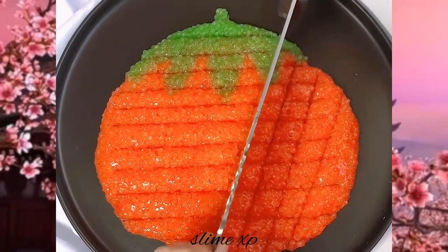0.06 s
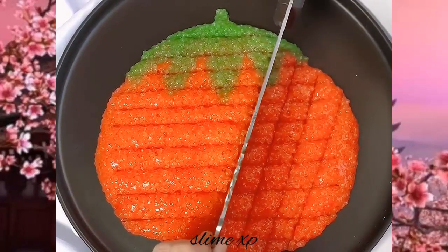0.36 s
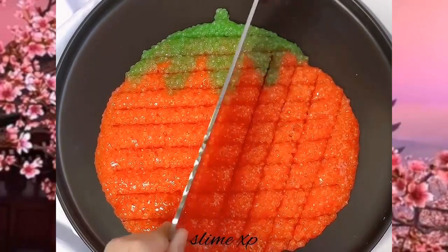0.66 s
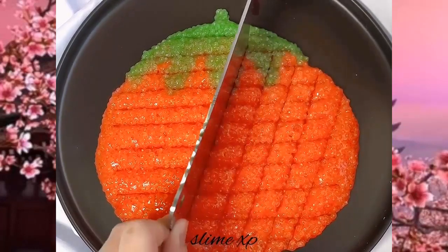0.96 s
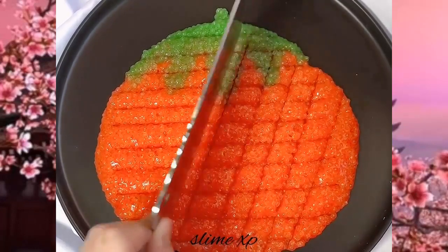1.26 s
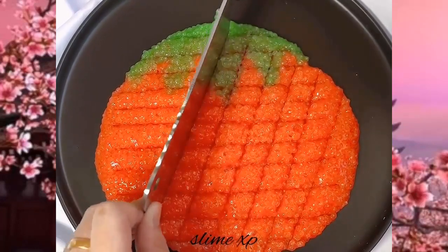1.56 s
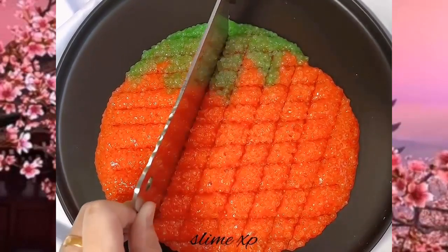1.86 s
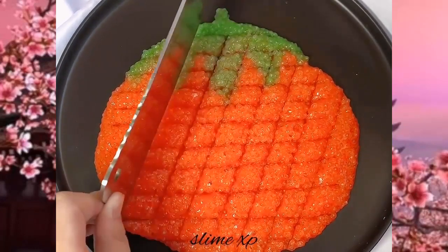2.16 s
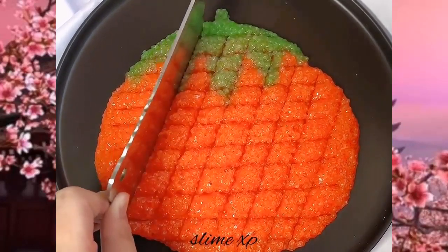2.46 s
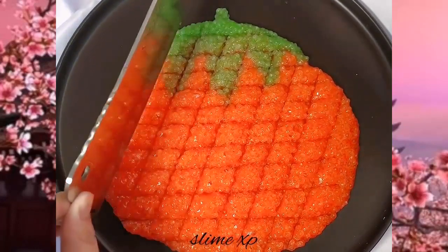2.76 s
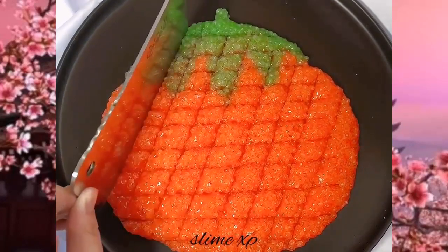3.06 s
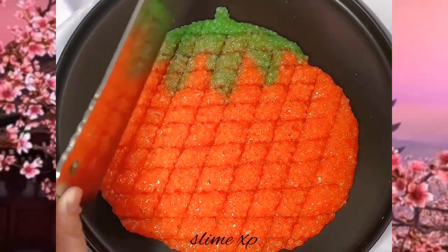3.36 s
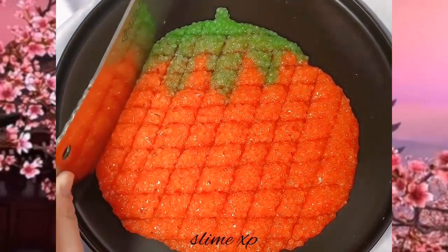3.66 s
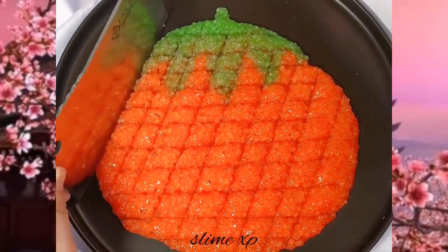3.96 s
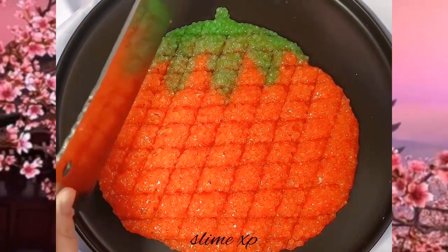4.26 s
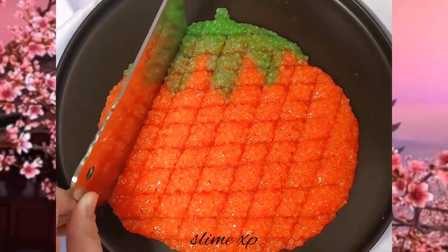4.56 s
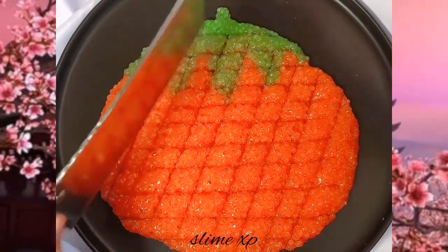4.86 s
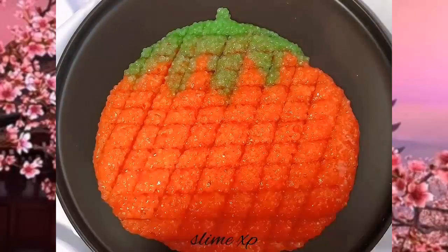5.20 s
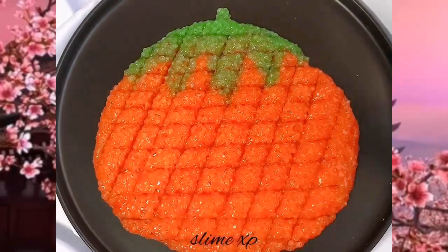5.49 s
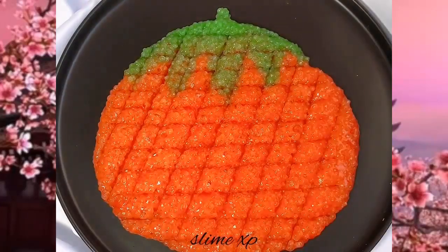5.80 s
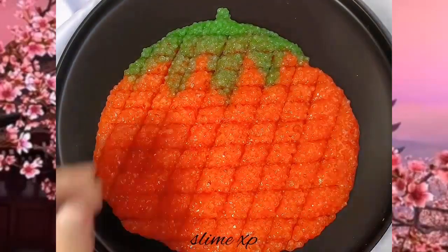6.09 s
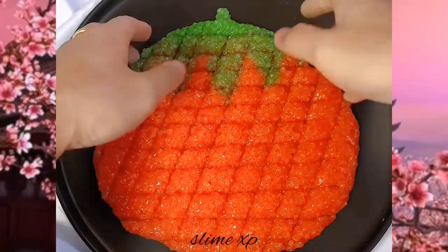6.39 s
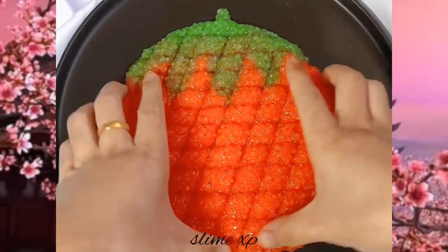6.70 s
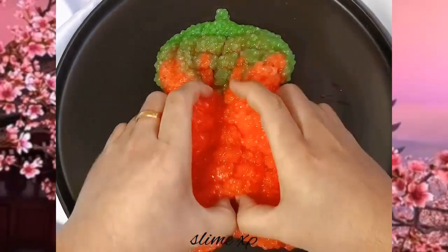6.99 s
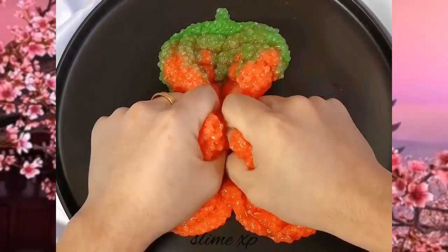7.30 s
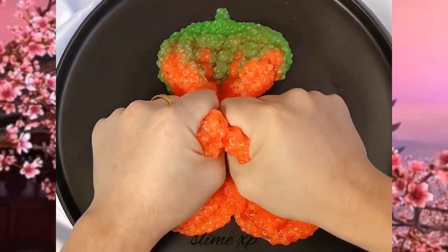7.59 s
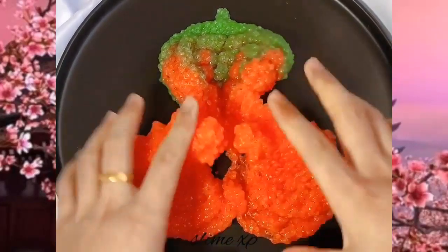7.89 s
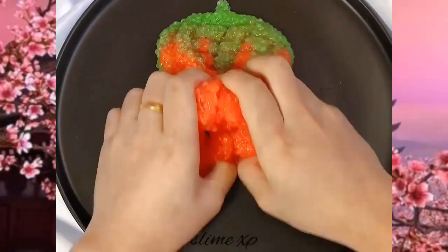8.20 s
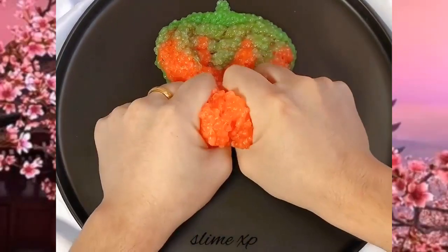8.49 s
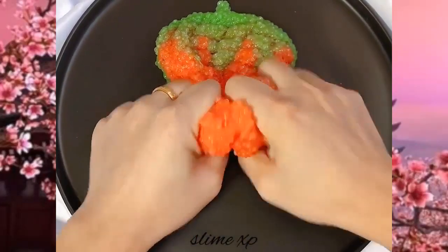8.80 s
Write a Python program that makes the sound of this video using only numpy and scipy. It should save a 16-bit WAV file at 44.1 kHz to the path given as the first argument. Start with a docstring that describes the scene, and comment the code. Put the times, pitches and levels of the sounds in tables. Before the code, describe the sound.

A kitchen knife presses seven times into bead-filled slime in a pan. Each stroke gives a short crunch with tiny snaps, muffled bead knocks and a dull thump, then a brief rasp as the blade peels out. The knife slides aside with a faint hiss. Two hands then squeeze the slime twice, with dense fizzing, wet plops, spurts of air and one small squeak. It is all heard close up in a small quiet room.

```python
"""First a kitchen knife presses seven times through bead-filled slime in a pan. Tiny air pockets crackle,
bigger ones snap, and beads slip from under the blade and knock on the pan. Each stroke ends in a dull
thump on the table, and the blade peels out again. After about five seconds the knife slides aside.
From about six and a half seconds two hands squeeze the slime twice: it fizzes, plops, squirts air and
squeaks once. All of it is heard close up in a small quiet room."""
import sys
import numpy as np
from scipy import signal
from scipy.fft import rfft, irfft
from scipy.io import wavfile
from scipy.ndimage import uniform_filter1d

SR = 44100
rng = np.random.default_rng(int(sys.argv[2]) if len(sys.argv) > 2 else 0)


def inscribe(sig):
    """Save sig as 16-bit PCM at rate SR to the path in sys.argv[1].

    A 1-D sig is mono; a 2-D sig holds one channel per row.
    Samples are clipped to [-1, 1] before scaling.
    """
    pcm = np.round(np.clip(np.atleast_2d(sig).T, -1, 1) * 32767)
    wavfile.write(sys.argv[1], SR, pcm.astype(np.int16))


N = 390285
TIME = np.arange(N) / SR
TOP_HZ = 16000

# A "fade time" (t60) is how long a sound takes to drop by 60 dB. A "relative" level is scaled later.
# Knife strokes. Each row: landing time and pressing time in seconds; relative levels of crunch, bead
# grinding and thump in dB; contact time in milliseconds; resting time in seconds; level change while
# resting in dB; relative level in dB of a treble band that is switched in on some strokes.
CUTS = [(0.406, 0.12, -39, -30.5, -20.5, 2.9, 0.064, -22, -43.5),
        (1.104, 0.16, -39, -36.5, -27, 6.2, 0.071, -10, -102),
        (1.849, 0.253, -41, -37, -29, 0.32, 0.055, -12, -73),
        (2.53, 0.19, -42, -39, -19, 1.5, 0.085, -8.5, -43),
        (3.156, 0.13, -42.5, -39, -21, 0.99, 0.092, -5, -68),
        (3.873, 0.099, -40, -39, -29, 1.2, 0.11, -17.5, -109),
        (4.568, 0.12, -42, -42, -25, 2.3, 0.12, -17.5, -44.5)]
# The blade peels out. Each row: start and length in seconds, fizz and added treble band in dB.
PEELS = [(0.588, 0.049, -41, -49.5), (1.322, 0.052, -41, -43.5), (2.07, 0.08, -43.5, -97),
         (2.74, .034, -42, -50), (3.407, 0.047, -40.5, -42), (4.169, .03, -48, -48),
         (4.849, 0.055, -43, -41)]
# Blade or fingertip touches the slime. Each row: start in seconds, relative dB, fade time in seconds.
TOUCHES = [(0.11, -46, 0.14), (.841, -45, 0.26), (1.501, -48.5, 0.28), (2.306, -54.5, 0.17),
           (2.945, -49, 0.13), (3.684, -50, 0.17), (6.41, -52.5, 0.16), (6.734, -52.5, 0.071)]
# The blade shifts in the cut; the last row is one sharp click as the knife is put aside. # Each row: start in
# seconds, relative dB, fade time in seconds.
SLIPS = [(0.172, -45, 0.21), (0.211, -39, 0.16), (3.967, -49.5, 0.021), (4.034, -43.5, 0.038),
         (4.664, -44, 0.04), (4.703, -45.5, 0.22), (5.9715, -42, 0.014)]
# A filter that shapes the knife's fizz and cuts it off near 10 kHz.
# Each row: frequency in Hz, relative level in dB.
CUT_FILTER = [(200, 12.5), (600, 6.5), (2500, 4), (6000, 7), (9500, 8.5), (10600, -40), (16000, -55)]
# Notes of the steel blade. Each row: pitch in Hz, width in Hz, relative level in dB.
BLADE_NOTES = [(5950, 260, 0), (7600, 160, -9), (10950, 60, -3)]
# Fingers squeeze. Each row: moment when half closed, then closing, holding and easing times, all in
# seconds; relative levels of fizz and of larger bubbles in dB.
GRIPS = [(6.537, 0.17, 0.0045, 0.092, -56.5, -53.5), (6.848, 0.13, 0.019, 0.2, -41, -42.5),
         (7.138, 0.1, 0.23, 0.25, -41, -41), (7.746, 0.05, 0.011, 0.063, -43, -44.5),
         (7.811, 0.031, 0.025, 0.066, -41.5, -38.5), (8.179, 0.18, 0.33, 0.19, -43.5, -42),
         (8.835, 0.099, 0.017, 0.036, -50, -42.5)]
# Tone of the fizz under the hands. Each row: frequency in Hz, relative level in dB.
KNEAD_TONE = [(150, -5), (600, -20.5), (2500, -4), (5000, -1.5), (8000, -1), (16000, -3)]
# Bubbles shrink and sound higher as the grip tightens. Each row: time in seconds, pitch in Hz.
BUBBLE_PITCH = [(7.02, 920), (7.3, 1600), (7.65, 1580), (7.85, 1253), (8.5, 1650), (8.85, 1638)]
# The largest air pockets snap. Each row: start in seconds, peak level in dB, pitch in Hz.
SNAPS = [(0.1547, -16.5, 7800), (0.997, -19.5, 7100), (1.011, -30, 7900), (2.4515, -19, 10100),
         (2.4713, -17.5, 8000), (.18, -25, 6000), (4.162, -23, 7400), (6.8588, -9.5, 4540),
         (7.0453, -11, 8640), (7.1152, -12, 7900), (7.373, -10, 10500), (7.4589, -11, 10500),
         (7.6294, -7, 8540), (8.21, -14, 11500), (8.2661, -13.5, 10100), (8.5143, -18, 10100),
         (8.6193, -13, 6450)]
# The blade slips off a bead or lands on the pan. Each row: start in seconds, peak level in dB,
# frequency in Hz above which the slime muffles the blow.
KNOCKS = [(.343, -22, 1200), (0.35, -21.5, 1180), (.371, -22.5, 1190), (0.403, -27, 1480),
          (1.07, -26, 1290), (1.101, -21, 1760), (1.2892, -27, 4150), (1.633, -29, 2210),
          (1.849, -24, 1990), (2.515, -24, 1590), (2.528, -23.5, 2000), (3.108, -29, 1120),
          (3.3126, -14, 1900), (3.874, -28.5, 1900), (4.54, -23, 2600), (4.767, -29.5, 1700)]
# Notes of the pan, damped by slime. Each row: pitch in Hz, relative level in dB, fade time in seconds.
PAN_NOTES = [(589, -9.5, 0.012), (760, 1, 0.0046), (915, 4, 0.0066), (1133, -2, 0.0066), (1497, -8, 0.015),
             (2330, -17.5, 0.02)]
# Short low bumps. Each row: start in seconds, level in dB, length of the push in milliseconds.
BUMPS = [(3.122, -28, 3.2), (3.315, -17, .65), (4.707, -31, 0.35), (5.971, -22, 3), (7.005, -36.5, 3.8),
         (7.836, -27.5, 24), (8.076, -32.5, 19), (8.619, -35, 0.3)]
# Notes of the table. Each row: pitch in Hz, relative level in dB, fade time in seconds.
TABLE_NOTES = [(50, -7, 0.13), (72, -3.5, 0.15), (111, -1, 0.17), (148, -7, 0.2), (200, -4, 0.18),
               (245, -3, 0.13), (360, -5, 0.07), (495, -7, 0.05)]
# Big wet bubbles pop in the fists. Each row: start in seconds, level in dB, middle pitch in Hz.
PLOPS = [(7.43, -31, 1480), (7.628, -26, 1270), (7.821, -26, 1210), (8.5426, -23, 1800), (8.657, -27, 1440)]
# Air squirts out between the fingers. Each row: loudest moment in seconds, level in dB, pitch in Hz.
SQUIRTS = [(7.386, -26, 12100), (7.821, -33, 4400), (8.463, -29, 3350), (8.493, -30.5, 6560),
           (8.517, -27.5, 9900), (8.542, -28.5, 2100)]
# The flat of the blade slides as the knife is put aside. Each row: loudest moment in seconds,
# relative level in dB, swelling time and dying time in seconds.
SLIDES = [(5.175, -80.5, 0.13, 0.057), (5.38, -81.5, 0.065, 0.023), (5.97, -79.5, 0.041, 0.12)]
# Tone of that sliding. Each row: frequency in Hz, relative level in dB.
SLIDE_TONE = [(200, -2), (7500, -5), (16000, -15.5)]
# The edge sings as it rubs the slime. Each row: loudest moment in seconds, level in dB, pitch in Hz.
ZINGS = [(5.172, -51, 5630)]
# Thin notes of the pan's rim. Each row: pitch in Hz, relative level in dB.
RIM_NOTES = [(3420, 0), (6250, -6)]
# Tone of the quiet room. Each row: frequency in Hz, relative level in dB.
ROOM_TONE = [(15, -83), (25, -8.5), (139, -7), (181, -3.5), (264, -18), (790, -24.5), (4500, -39),
             (15000, -51)]


def knife(crunch_rise_db=2.5, grind_rise_db=14):
    """The blade crunches in by fits, grinds beads on the pan, and peels out with a more even rasp."""
    bursts = crush(fizz(density=24000, spread_db=3.5, cycles=6.5, patchy_db=7))
    # The fizz is cut off near 10 kHz; a treble band above it is switched in on some strokes.
    air = unit(steel(colour(bursts, CUT_FILTER)))
    treble = band(11800, 1.23, N)
    fits = steady(clusters(rate=110, spread_db=3.4, length_s=.0006, trickle=.5) * waver(90, 3.3))
    even = steady(clusters(rate=170, spread_db=3.3, length_s=.0005, trickle=.55))
    beads = muffle(patter(PAN_NOTES, rate=260, spread_db=4.5, detune=0.08), hz=1900)
    crunch, grind, rasp = 0, 0, 0
    for land, length, db, grind_db, _, _, rest, ease_db, treble_db in CUTS:
        blend = undb(db) * air + undb(treble_db) * treble
        crunch += press(land, length, crunch_rise_db, rest, ease_db) * blend
        grind += undb(grind_db) * press(land, length, grind_rise_db, rest, ease_db)
    for s, length, db, treble_db in PEELS:
        rasp += peel(s, length) * (undb(db) * air + undb(treble_db) * treble)
    touch = np.zeros(N)
    for s, db, t60 in TOUCHES + SLIPS:
        add(touch, s, undb(db) * fade(TIME[:SR // 2], t60))
    cutting = (undb(-3) * crunch + undb(4) * touch * air) * fits
    return cutting + rasp * even + undb(-4) * grind * beads


def press(land, length, rise_db, rest, ease_db, ease_s=.014, stop_s=.009):
    """Loudness of a press: it builds until the blade lands, eases while it rests, and stops short."""
    db = np.interp(TIME, [land - length, land, land + ease_s], [-rise_db, 0, ease_db])
    return undb(db) * gate(land - length, land + rest, stop_s / 2, stop_s)


def peel(s, length, cling_db=-18, cling_s=0.034):
    """Loudness of a peel: the slime clings faintly, tears off all along the blade, and lets go."""
    from_middle = np.abs(2 * (TIME - s) / length - 1)
    tearing = np.exp(-np.minimum(from_middle, 10) ** 3 / 2)
    return np.maximum(tearing, undb(cling_db) * gate(s, s + length, cling_s, cling_s))


def steel(x):
    """Whatever touches the blade makes it ring faintly."""
    return x + sum(undb(db) * signal.lfilter(*signal.iirpeak(hz, hz / width, fs=SR), x)
                   for hz, width, db in BLADE_NOTES)


def hands(width_octaves=0.55):
    """Kneading bursts a dense fizz, squeezes out larger bubbles, and nudges the table."""
    fizz_gain, bubble_gain = grip()
    pitch = np.interp(TIME, *np.transpose(BUBBLE_PITCH))
    surge = clusters(rate=120, spread_db=3.8, length_s=.0005, trickle=.55)
    bursts = fizz(density=6000, spread_db=4, cycles=6.1, patchy_db=7.5)
    air = steady(colour(bursts, KNEAD_TONE) * surge)
    bubbles = 0
    for hz in np.geomspace(800, 3600, 9):
        near_pitch = np.exp(-(np.log2(hz / pitch) / width_octaves) ** 2 / 2)
        bubbles += near_pitch * pockets(hz, density=7000, spread_db=2.5, cycles=10.9, patchy_db=3)
    squelch = undb(0.5) * bubble_gain * steady(bubbles * np.sqrt(surge))
    nudges = patter(TABLE_NOTES, rate=13, spread_db=1.5, detune=0.15)
    return fizz_gain * (undb(7.5) * air + undb(-17) * nudges) + squelch


def grip():
    """Loudness of the fizz and of the larger bubbles as fingers close, hold, and ease off."""
    fizz_power, bubble_power = 0, 0
    for s, closing, holding, easing, fizz_db, bubble_db in GRIPS:
        closed = (1 + np.tanh(2 * (TIME - s) / closing)) / 2
        force = closed * np.exp(-(np.maximum(TIME - s - holding, 0) / easing) ** 2)
        fizz_power += (undb(fizz_db) * force) ** 2
        bubble_power += (undb(bubble_db) * force) ** 2
    return np.sqrt(fizz_power), np.sqrt(bubble_power)


def fizz(density, spread_db, cycles, patchy_db):
    """Air pockets of every size burst together; now one size stands out, now another."""
    return sum(pockets(hz, density, spread_db, cycles, patchy_db) * waver(30, 3)
               for hz in np.geomspace(400, 15000, 15))


def pockets(hz, density, spread_db, cycles, patchy_db):
    """Air pockets of one size burst in patches; small, high ones outnumber large, low ones."""
    t = TIME[:SR // 50]
    burst = unit(np.sin(2 * np.pi * hz * t) * fade(t, cycles / hz))
    triggers = clicks(density * hz / SR, spread_db) * waver(220, patchy_db)
    return signal.oaconvolve(triggers, burst)[:N]


def clusters(rate, spread_db, length_s, trickle):
    """One burst sets off its neighbours: short surges in loudness over a constant trickle."""
    t = TIME[:SR // 50]
    surge = t ** 3 * np.exp(-t / length_s)
    return trickle + unit(signal.oaconvolve(np.abs(clicks(rate, spread_db)), surge)[:N])


def crush(x, ceiling=3.3):
    """Thin films burst before they store much energy, so no burst stands far above the rest."""
    return unit(np.tanh(steady(x) / ceiling))


def snaps(cycles=4, spray_db=-12, spray_t60=0.014):
    """A big air pocket cracks with one short swing, then its film sprays."""
    out, t = np.zeros(N), TIME[:SR // 30]
    for s, db, hz in SNAPS + small_snaps():
        crack = np.sin(2 * np.pi * hz * t) * fade(t, cycles / hz)
        spray = undb(spray_db) * band(hz, 1.43, len(t)) * fade(t, spray_t60)
        add(out, s, at_peak(crack / crack.max() + spray, db))
    return out


def small_snaps(per_second=6, boost_db=14, middle_hz=5500, spread_octaves=0.81):
    """Smaller pockets snap at random, louder under a harder squeeze. Gives rows like those of SNAPS."""
    effort, _ = grip()
    rows, s = [], 0
    for wait, size, pitch in rng.random((200, 3)):
        s -= np.log(1 - wait) / per_second
        if s < TIME[-1]:
            db = 20 * np.log10(effort[int(s * SR)] + 1e-9) + boost_db + 3 * (2 * size - 1)
            hz = middle_hz * 2 ** (spread_octaves * (2 * pitch - 1))
            rows.append((s, db, hz))
    return rows


def knocks(click_db=-10, click_t60=0.016):
    """The blade hits the pan hard and short, each time with the click of a bead giving way."""
    out = np.zeros(N)
    for s, db, muffle_hz in KNOCKS:
        body = muffle(ring(PAN_NOTES, detune=0.025), muffle_hz)
        noise = rng.standard_normal(len(body)) * fade(TIME[:len(body)], click_t60)
        click = undb(click_db) * muffle(noise, 3.5 * muffle_hz)
        add(out, s, at_peak(at_peak(body, 0) + click, db))
    return out


def thumps(low_cut_hz=36, roughness=0.07, lag_s=0.01537, touch_boost_db=8.5, touch_contact_ms=19):
    """Touches and landings shake the table, roughened by shifting beads; short low bumps join them."""
    out, t = np.zeros(N), TIME[:SR // 20]
    # A touch reaches the table through the slime, a moment late.
    touches = [(s + lag_s, db + touch_boost_db, touch_contact_ms) for s, db, _ in TOUCHES]
    landings = [(land, db, contact_ms) for land, _, _, _, db, contact_ms, *_ in CUTS]
    for s, db, push_ms in touches + landings + BUMPS:
        age = t / (push_ms / 1000)  # a longer push sounds deeper
        shifting = roughness * band(264, 3.1, len(t)) * np.exp(-age / 3)
        push = 6 * age * np.exp(1 - 6 * age) + shifting
        body = signal.fftconvolve(ring(TABLE_NOTES, detune=0.04), push)
        add(out, s, at_peak(body, db))
    # The slowest swings give off hardly any sound.
    return signal.sosfilt(signal.butter(2, low_cut_hz, "high", fs=SR, output="sos"), out)


def plops(cycles=14, rise=0.038):
    """A big bubble rings for a few swings, rising in pitch as it opens."""
    out, t = np.zeros(N), TIME[:SR // 30]
    for s, db, hz in PLOPS:
        dying = fade(t, cycles / hz)
        pitch = hz * (1 + rise * (.5 - dying))
        add(out, s, undb(db) * np.sin(2 * np.pi * np.cumsum(pitch) / SR) * dying)
    return out


def squirts(half_length_s=0.0029):
    """A rush of equal bubbles through one gap swells and ends within a few milliseconds."""
    out, t = np.zeros(N), TIME[:SR // 30] - 1 / 60
    for s, db, hz in SQUIRTS:
        add(out, s + t[0], undb(db) * band(hz, np.sqrt(2), len(t)) / np.cosh(t / half_length_s))
    return out


def squeak(start_s=7.621, db=-35, start_hz=3150, end_hz=2780, glide_s=.009, t60=0.13):
    """Air squeaks unsteadily through a pinhole, sinking in pitch as the pressure goes."""
    out, t = np.zeros(N), TIME[:SR // 8]
    glide = end_hz + (start_hz - end_hz) * np.exp(-t / glide_s)
    pitch = glide * waver(600, 0.45)[:len(t)]
    tone = np.sin(2 * np.pi * np.cumsum(pitch) / SR)
    add(out, start_s, undb(db) * tone * np.tanh(t / 0.002) * fade(t, t60))
    return out


def slides():
    """The flat of the steel rubs with a fine hiss, and its edge gives a short zing."""
    rub = colour(clicks(rate=2500, spread_db=4.5), SLIDE_TONE)
    zings = sum(swell(s, db, rise_s=.025, fall_s=.022) * band(hz, 1.09, N) for s, db, hz in ZINGS)
    sliding = sum(swell(*row) for row in SLIDES)
    return undb(22.5) * sliding * unit(steel(rub)) + zings


def rim(x, db=-28, t60=.5):
    """Crackling in the pan sets its rim ringing faintly."""
    ringing = ring([(hz, note_db, t60) for hz, note_db in RIM_NOTES], detune=0)
    return x + undb(db) * signal.oaconvolve(x, ringing / np.sqrt(np.sum(ringing ** 2)))[:N]


def reflections(x, near_db=-16, near_t60=.016, room_db=-19, room_t60=.24):
    """Quick echoes come from the pan wall and hands, then the faint tail of the room."""
    t = TIME[:SR // 2]
    echoes = np.zeros(len(t))
    for db, t60, delay_s in [(near_db, near_t60, .0006), (room_db, room_t60, .006)]:
        tail = rng.standard_normal(len(t)) * fade(t, t60) * (t > delay_s)
        echoes += undb(db) * tail / np.sqrt(np.sum(tail ** 2))
    return x + signal.fftconvolve(x, echoes)[:N]


def room_tone(db=-57):
    """The room's quiet rumble and faint hiss waver a little."""
    return unit(colour(rng.standard_normal(N), ROOM_TONE)) * undb(db) * waver(5, 1.5)


def ring(notes, detune, scatter_db=2):
    """One blow rings an object's notes; each spot has its own tuning and balance."""
    t, out = TIME[:SR // 3], 0
    for k, (hz, db, t60) in enumerate(notes):
        tuning, balance = rng.standard_normal(2)
        tone = (-1) ** k * np.sin(2 * np.pi * hz * (1 + detune * tuning) * t)  # every other one flipped
        out += undb(db + scatter_db * balance) * tone * fade(t, t60)
    return out


def patter(notes, rate, spread_db, detune, spots=5):
    """Many small blows land on different spots of one object, rate times a second on each."""
    return steady(sum(signal.oaconvolve(clicks(rate, spread_db), ring(notes, detune))[:N]
                      for _ in range(spots)))


def muffle(x, hz):
    """Soft slime takes the treble off a blow."""
    return signal.sosfilt(signal.butter(3, min(hz, TOP_HZ), fs=SR, output="sos"), x)


def clicks(rate, spread_db):
    """Random clicks, about rate a second: many small, a few large."""
    chance = rng.random(N) * SR / rate
    at = np.flatnonzero(chance < 1)
    out = np.zeros(N)
    out[at] = (-1.) ** at * undb(spread_db * np.minimum(-np.log(chance[at]), 4))
    return out


def band(hz, ratio, size):
    """Hiss around one pitch, from hz / ratio up to hz * ratio."""
    edges = np.clip([hz / ratio, hz * ratio], 20, TOP_HZ)
    bandpass = signal.butter(2, edges, "band", fs=SR, output="sos")
    return unit(signal.sosfilt(bandpass, rng.standard_normal(size)))


def colour(x, points, size=4096):
    """Shape a sound's tone along a curve of (Hz, dB) points."""
    hz, db = np.transpose(points)
    freqs = np.maximum(np.arange(size // 2 + 1) * SR / size, 1)
    gains = undb(np.interp(np.log(freqs), np.log(hz), db))
    # Folding onto the first half makes the filter ring only after a click, never before it.
    cepstrum = irfft(np.log(gains))
    cepstrum[1:size // 2] *= 2
    cepstrum[size // 2 + 1:] = 0
    return signal.fftconvolve(x, irfft(np.exp(rfft(cepstrum))))[:len(x)]


def steady(x, size=2205):
    """Even out slow changes in loudness and keep the fine crackle."""
    power = uniform_filter1d(uniform_filter1d(x ** 2, size), size // 2)
    return x / np.sqrt(power + np.mean(x ** 2) / 20)


def waver(rate, db):
    """Loudness that wanders at random, rate times a second."""
    steps = rng.standard_normal(N // 20)
    return undb(db * np.interp(TIME * rate, np.arange(len(steps)), steps))


def swell(s, db, rise_s, fall_s):
    """Loudness that grows smoothly until second s, then dies away."""
    from_peak = (TIME - s) / np.where(TIME < s, rise_s, fall_s)
    return undb(db) / np.cosh(np.clip(from_peak, -20, 20)) ** 1.6


def gate(start, end, attack_s, release_s):
    """Full loudness between two times, falling away before and after."""
    outside = np.maximum(start - TIME, 0) / attack_s + np.maximum(TIME - end, 0) / release_s
    return np.exp(-np.minimum(outside, 20))


def fade(t, t60):
    """Die away, 60 dB down after t60 seconds."""
    return np.exp(-np.log(1000) * t / t60)


def undb(db):
    """Turn decibels into a multiplier."""
    return 10 ** (np.asarray(db) / 20)


def unit(x):
    """Scale to an average (rms) level of 1."""
    return x / np.sqrt(np.mean(x ** 2) + 1e-18)


def at_peak(x, db):
    """Scale so the highest peak is at db."""
    return undb(db) * x / np.abs(x).max()


def add(out, s, sound):
    """Mix a sound in, starting at second s."""
    i = max(int(s * SR), 0)
    out[i:i + len(sound)] += sound[:N - i]


def scene():
    """Knife and hands work the slime, close by in a quiet room."""
    slime = knife() + rim(hands()) + slides() + snaps() + plops() + squirts()
    slime += knocks() + thumps() + squeak()
    return (reflections(slime) + room_tone())[None]


def record(dry):
    """Cut away the highest treble, above TOP_HZ."""
    return signal.sosfilt(signal.ellip(8, .2, 70, TOP_HZ, fs=SR, output="sos"), dry)


dry = scene()
out = record(dry)
inscribe(out)
```